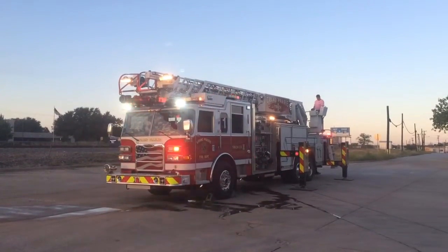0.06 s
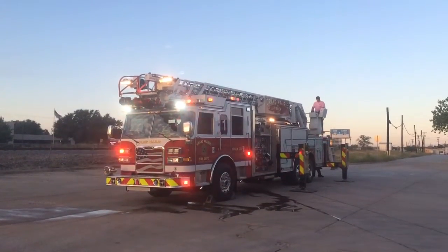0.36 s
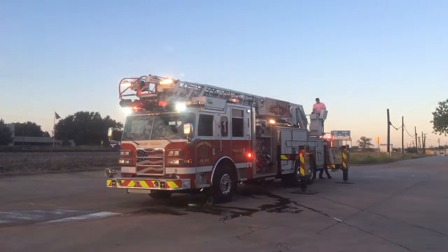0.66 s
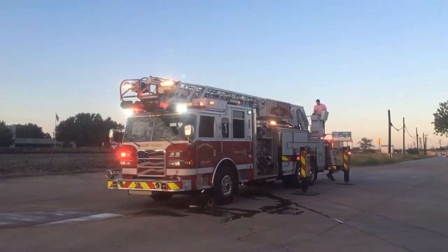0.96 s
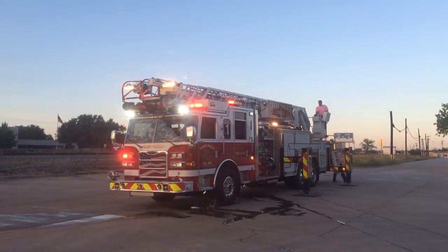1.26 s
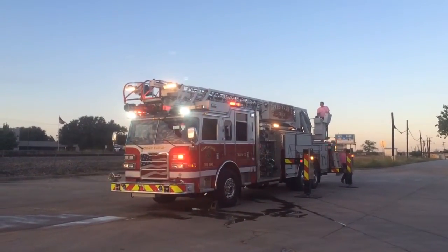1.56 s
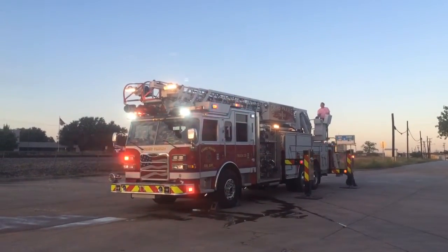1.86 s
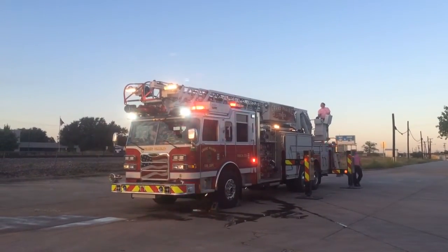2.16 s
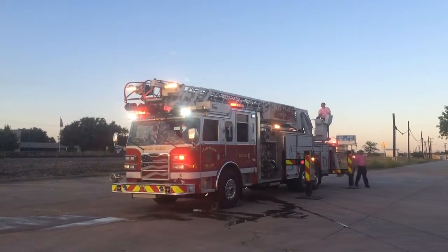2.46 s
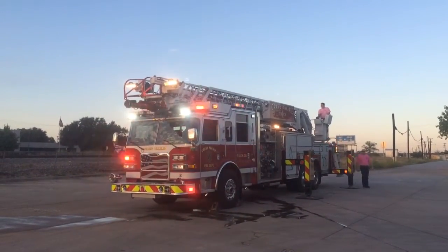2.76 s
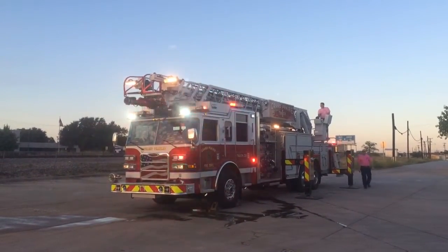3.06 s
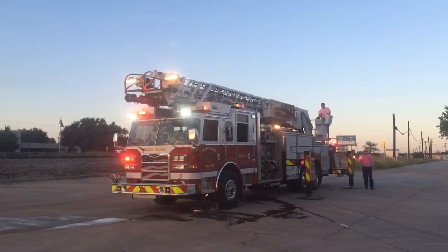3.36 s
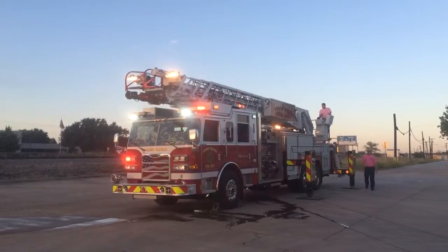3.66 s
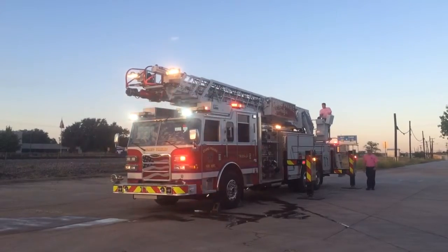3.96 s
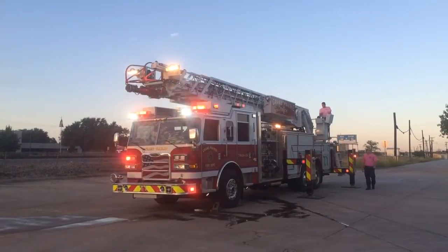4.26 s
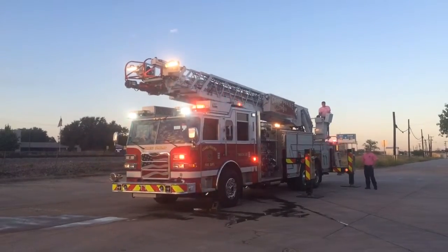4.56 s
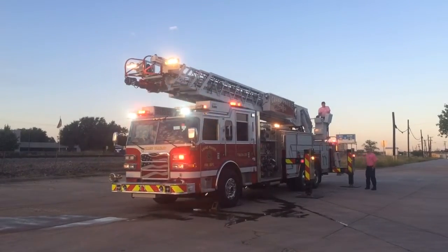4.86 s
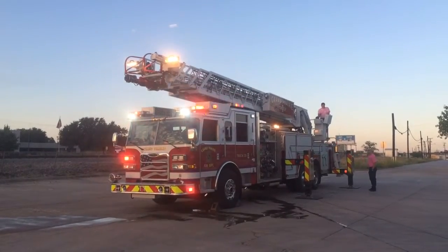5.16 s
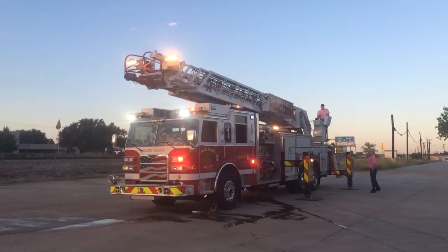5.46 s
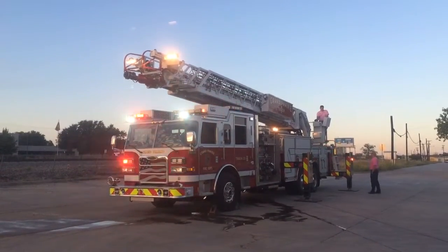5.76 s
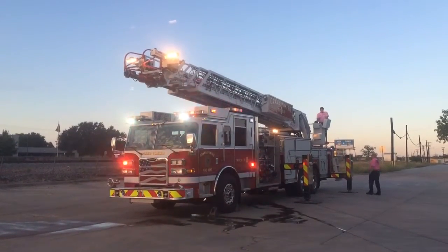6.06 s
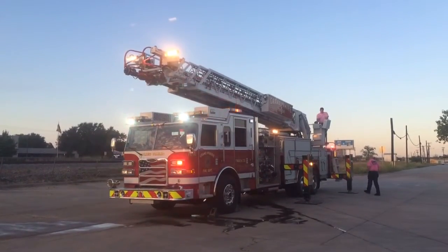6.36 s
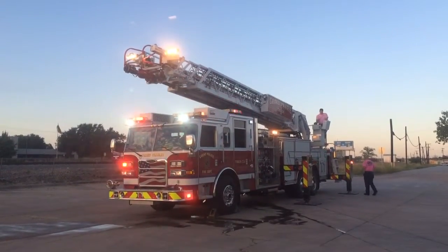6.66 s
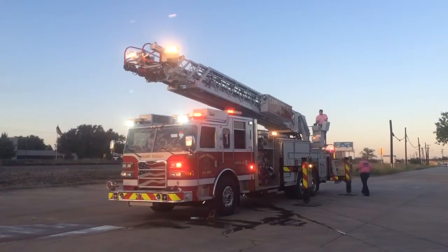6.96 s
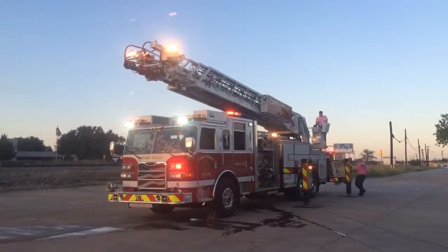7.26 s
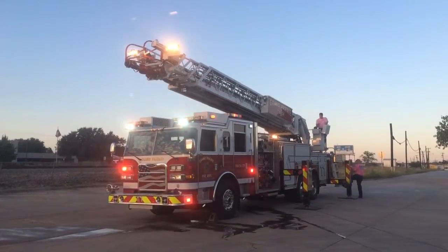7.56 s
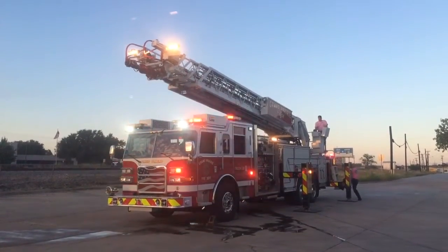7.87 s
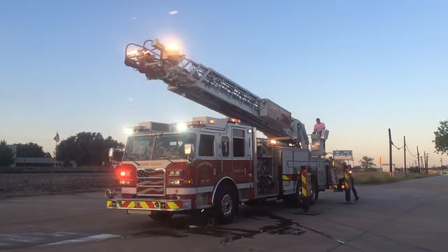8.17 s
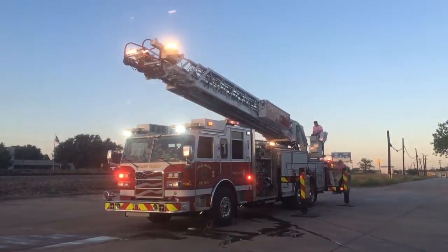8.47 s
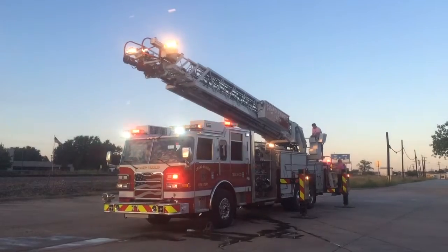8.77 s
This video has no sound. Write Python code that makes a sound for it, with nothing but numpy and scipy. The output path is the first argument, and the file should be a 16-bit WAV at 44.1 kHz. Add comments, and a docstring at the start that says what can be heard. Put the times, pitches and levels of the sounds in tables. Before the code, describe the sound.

A fire truck's diesel engine drones and clatters steadily under a high hydraulic whine as its ladder rises.

```python
"""Concrete lot: a parked fire engine holds its six-cylinder diesel at fast idle and raises its ladder.
Firings make the exhaust drone and the block hum; injectors, valves and combustion knock and clatter.
The timing gears sing in swells with every cycle, and the hydraulic pump whines under a thin whistle.
As the ladder lifts, the speed sags briefly, the pump drive grows louder and oil hisses through the valve.
"""
import sys
import numpy as np
from scipy import signal
from scipy.fft import rfft, irfft
from scipy.io import wavfile
from scipy.ndimage import map_coordinates

SR = 44100
rng = np.random.default_rng(int(sys.argv[2]) if len(sys.argv) > 2 else 0)


def bounce(signal):
    """Save signal as a 16-bit WAV file at the path given by the first command-line argument."""
    frames = np.transpose(np.atleast_2d(signal))
    limited = np.clip(frames, -1, 1)
    pcm = np.round(limited * 32767).astype(np.int16)
    wavfile.write(sys.argv[1], SR, pcm)


N = 396900
TIME = np.arange(N) / SR
IDLE_RPM, IDLE_EFFORT = 1352.3, .25


def from_db(db):
    """Decibels to gain."""
    return 10 ** (np.asarray(db) / 20)


def drift(rate_hz):
    """Smooth random signal, unit spread, rolled off above rate_hz."""
    hz = np.fft.rfftfreq(N // 20, 20 / SR)
    slow = irfft(rfft(rng.standard_normal(N // 20)) / (1 + (hz / rate_hz) ** 2))
    return np.interp(np.arange(N) / 20, np.arange(len(slow)), slow / slow.std())


def noise(spectrum, size=N):
    """Loopable noise from rows of f/Hz, density/(dB re 1/Hz)."""
    hz, density_db = np.transpose(spectrum)
    bins_hz = np.maximum(np.fft.rfftfreq(size, 1 / SR), 1)
    gain = from_db(np.interp(np.log(bins_hz), np.log(hz), density_db, left=-np.inf, right=-np.inf))
    return irfft(rfft(rng.standard_normal(size)) * gain * np.sqrt(SR / 2), size)


def tone(turns, level_db, waver_db, jitter_rad):
    """Partial with phase jitter; its level wavers in the open air."""
    phase = 2 * np.pi * turns + jitter_rad * drift(8.3)
    return np.sqrt(2) * from_db(level_db + waver_db * drift(4.6)) * np.sin(phase)


# Speed sags: centre t/s, sigma/s, depth/rpm
SPEED_SAGS = [(0.0, .2, 7.6), (2.32, .36, 14.9)]

def crankshaft(fuel_lag_s, rpm_per_effort, hunt_cycles):
    """Cycle count and fuel effort: the governor hunts slightly and answers each sag with more fuel."""
    sag_rpm = sum(depth * np.exp(-.5 * ((TIME - at_s) / sigma_s) ** 2)
                  for at_s, sigma_s, depth in SPEED_SAGS)
    cycles = np.cumsum((IDLE_RPM - sag_rpm) / 60 / 2) / SR  # four-stroke: two turns a cycle
    pole = np.exp(-1 / (fuel_lag_s * SR))
    effort = IDLE_EFFORT + signal.lfilter([1 - pole], [1, -pole], sag_rpm / rpm_per_effort)
    return cycles + hunt_cycles * drift(.8), effort


# Gear swells: place/cycles, sigma/cycles, order (f / cycle rate), relative peak/dB, slope/(dB/effort)
GEAR_SWELLS = [(.0081, .1045, 83.587, -29.6, 2.5), (.279, .0796, 81.306, -25.5, -.5),
               (.3984, .0725, 82.574, -21.9, -1.2), (.6712, .0954, 81.023, -26.4, 3)]

def timing_gears(cycles, effort, gain_db, waver_db, slip_rad, orders_per_effort):
    """The mesh swells as the crankshaft twists; more fuel twists it faster and lifts the pitch."""
    out = 0
    for place, sigma, order, peak_db, effort_db in GEAR_SWELLS:
        offset_cycles = (cycles - place + .5) % 1 - .5
        swell_db = gain_db + peak_db + effort * effort_db + waver_db * drift(11)
        swell = from_db(swell_db) * np.exp(-.5 * (offset_cycles / sigma) ** 2)
        mesh_order = order + orders_per_effort * (effort - IDLE_EFFORT)
        out += swell * np.cos(2 * np.pi * mesh_order * offset_cycles + slip_rad * drift(2.7))
    return out


# Exhaust lines: order, level/dB
EXHAUST_LINES = [(6, -44), (9, -45), (10, -47), (11, -47), (12, -36), (18, -41), (19, -49), (20, -44),
                 (21, -46), (22, -51), (24, -52), (30, -52)]

def exhaust_drone(cycles, effort, boom_db):
    """Six firings a cycle give the strong lines, unequal cylinders the rest; fuel adds boom."""
    out = 0
    for order, level_db in EXHAUST_LINES:
        start_turns = rng.random() * (order % 6 != 0)  # firing harmonics align into puffs
        if order == 12:  # pipe resonance
            level_db += boom_db * (effort - .4)
        out += tone(order * cycles + start_turns, level_db, waver_db=.76, jitter_rad=.15)
    return out


# Knock spectrum: f/Hz, density/dB
KNOCK_SPECTRUM = [(140, -72.5), (260, -67.5), (350, -69.5), (410, -86), (490, -82.5), (600, -69.5),
                  (800, -69.5), (920, -76), (1100, -69), (1400, -73), (2900, -70), (3800, -90.5),
                  (5500, -100), (9000, -125)]

def knocks(cycles, spread_db, size=4096):
    """Injectors and valves repeat one pattern, stretched to the cycle, at uneven strength."""
    pattern = noise(KNOCK_SPECTRUM, size)
    looped = map_coordinates(pattern, [cycles % 1 * size], order=3, mode="grid-wrap")
    return looped * from_db(spread_db * drift(25))


# Combustion spectrum: f/Hz, density/dB
CLATTER_SPECTRUM = [(700, -94), (1600, -72.5), (2300, -68.5), (2900, -67), (3300, -70.5), (3750, -76.5),
                    (4300, -80.5), (5300, -85.5), (7000, -97), (8450, -97.5), (8850, -103), (9250, -100),
                    (9700, -108), (15000, -120)]

def clatter(cycles, pulse_db):
    """Combustion noise pulses gently with each firing."""
    firings = np.cos(2 * np.pi * 6 * cycles)
    return noise(CLATTER_SPECTRUM) * from_db(pulse_db * firings)


# Valve gear ring before the envelope: f/Hz, density/dB
TAPPET_SPECTRUM = [(2300, -85.5), (2700, -63.5), (2900, -64.5), (3150, -65.5), (3600, -83)]

def tappets(cycles, start_cycles, rise_cycles, fade_cycles, spread_db, grit_db):
    """The valve gear rattles in one uneven burst a cycle."""
    age = (cycles - start_cycles) % 1
    envelope = (1 - np.exp(-age / rise_cycles)) * np.exp(-age / fade_cycles) * (1 - age ** 4)
    return noise(TAPPET_SPECTRUM) * from_db(spread_db * drift(12) + grit_db * drift(120)) * envelope


# Block panels: first order, last order, relative level per line/dB
BLOCK_PANELS = [(27, 28, -54), (32, 33, -55), (44, 46, -53.5), (54, 56, -54.5), (60, 63, -52),
                (69, 71, -53.5), (74, 77, -54), (86, 88, -51), (93, 93, -53), (99, 100, -56)]

def block_hum(cycles, gain_db):
    """Each cycle shakes the block; each panel passes the orders near its resonance."""
    return sum(tone(order * cycles + rng.random(), gain_db + line_db, waver_db=0, jitter_rad=.13)
               for first, last, line_db in BLOCK_PANELS for order in range(first, last + 1))


def gear_cover(hz, width_hz, level_db):
    """Backlash keeps the cover ringing near the mesh pitch."""
    b, a = signal.iirpeak(hz, hz / width_hz, fs=SR)
    ring = signal.lfilter(b, a, signal.lfilter(b, a, rng.standard_normal(N)))
    return from_db(level_db) * ring / ring.std()


# Valve lever pushes: t/s, added load (1 = steady lift)
LEVER_PUSHES = [(1.6, 0.45), (2.55, 0.34)]

def lift_valve(push_s, idle_load, creep_per_s):
    """Oil load and last push's travel, 0-1: each push adds ladder weight, then pressure creeps up."""
    load = idle_load
    for start_s, added_load in LEVER_PUSHES:
        travel = np.clip((TIME - start_s) / push_s, 0, 1)
        load += added_load * travel
    lifting_s = np.maximum(TIME - LEVER_PUSHES[-1][0], 0)
    return load + creep_per_s * lifting_s, travel


def whine(turns, partials, load, waver_db, jitter_rad):
    """Partials move from unloaded to loaded level with oil pressure."""
    out = 0
    for order, unloaded_db, loaded_db in partials:
        level_db = unloaded_db + load * (loaded_db - unloaded_db)
        out += tone(order * turns + rng.random(), level_db, waver_db, jitter_rad)
    return out


# Pump drive and accessory gears: order, unloaded level/dB, loaded level/dB
DRIVE_LINES = [(75.43, -45.5, -45.5), (104.54, -39.3, -37.6), (108.55, -60, -47), (120.18, -48, -52),
               (182, -53, -46.5), (194, -45.3, -38.7), (200, -53, -44), (206, -54, -45), (212, -57, -49),
               (320, -58, -57)]

def pump_drive(cycles, effort, load, db_per_effort):
    """Gear whine grows with load and softens while the engine labours."""
    mesh = whine(cycles, DRIVE_LINES, load, waver_db=.93, jitter_rad=.3)
    return mesh * from_db(db_per_effort * (effort - IDLE_EFFORT))


# Pump lines: harmonic of piston rate, unloaded level/dB, loaded level/dB
PUMP_LINES = [(2, -57, -58), (4, -51, -51.5), (5, -48.5, -48.5), (10, -62, -48), (12, -52, -52.5),
              (13, -55, -57), (14, -53.5, -55), (15, -63, -64), (16, -68, -63), (17, -64.5, -63),
              (19, -65, -67), (20, -69, -69)]

def hydraulic_pump(cycles, load, pistons_per_cycle):
    """Engine-driven pistons whine at harmonics of their stroke rate."""
    return whine(pistons_per_cycle * cycles, PUMP_LINES, load, waver_db=3, jitter_rad=.56)


# Oil hiss at load 1: f/Hz, density/dB
OIL_SPECTRUM = [(1500, -87.5), (2000, -71.5), (2350, -68), (2800, -74.5), (3300, -77.5), (4400, -88),
                (6000, -99), (9000, -118)]

def oil_hiss(load):
    """Oil rushes through the valve; noise power follows load."""
    return np.sqrt(load) * noise(OIL_SPECTRUM)


def whistle(travel, hz, wander_hz, idle_db, lifting_db):
    """A thin whistle wanders in pitch and recedes as the valve opens fully."""
    pitch_hz = hz + wander_hz * drift(1.2)
    level_db = idle_db + (lifting_db - idle_db) * travel
    return tone(np.cumsum(pitch_hz) / SR, level_db, waver_db=1.5, jitter_rad=.8)


# Fan and air spectrum: f/Hz, density/dB
FAN_SPECTRUM = [(20, -77.5), (45, -67), (75, -61), (125, -63), (170, -63.5), (250, -64), (295, -69.5),
                (345, -68.5), (415, -72.5), (500, -67.5), (760, -68.5), (1300, -68), (1700, -74),
                (3000, -100)]

def fan_rumble():
    """Steady rumble of fan and air."""
    return noise(FAN_SPECTRUM)


def scene():
    """One crankshaft drives engine, gears and pump; the ladder loads the hydraulics."""
    cycles, effort = crankshaft(fuel_lag_s=.2, rpm_per_effort=15, hunt_cycles=.002)
    load, travel = lift_valve(push_s=.27, idle_load=.047, creep_per_s=.032)
    engine = exhaust_drone(cycles, effort, boom_db=4.5) + knocks(cycles, spread_db=2.04) + fan_rumble()
    engine += block_hum(cycles, gain_db=.67)
    engine += clatter(cycles, pulse_db=.7)
    engine += tappets(cycles, start_cycles=.39, rise_cycles=.03, fade_cycles=.48,
                      spread_db=2, grit_db=.5)
    gears = timing_gears(cycles, effort, gain_db=1, waver_db=.87, slip_rad=.15, orders_per_effort=.92)
    gears += gear_cover(hz=928.6, width_hz=132, level_db=-39.5)
    gears += pump_drive(cycles, effort, load, db_per_effort=-1)
    hydraulics = hydraulic_pump(cycles, load, pistons_per_cycle=24.59) + oil_hiss(load)
    hydraulics += whistle(travel, hz=9200, wander_hz=20, idle_db=-72.5, lifting_db=-78)
    return (engine + gears + hydraulics)[None]


def record(dry):
    """Steep low-pass at 15.3 kHz."""
    return signal.sosfilt(signal.ellip(10, .1, 80, 15300, fs=SR, output="sos"), dry)


dry = scene()
out = record(dry)
bounce(out)
```